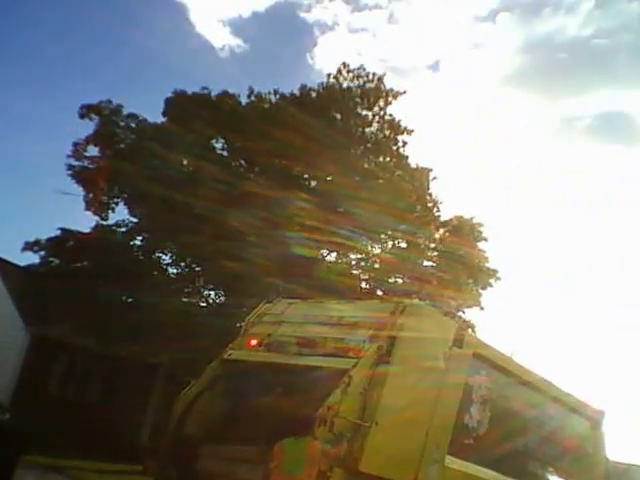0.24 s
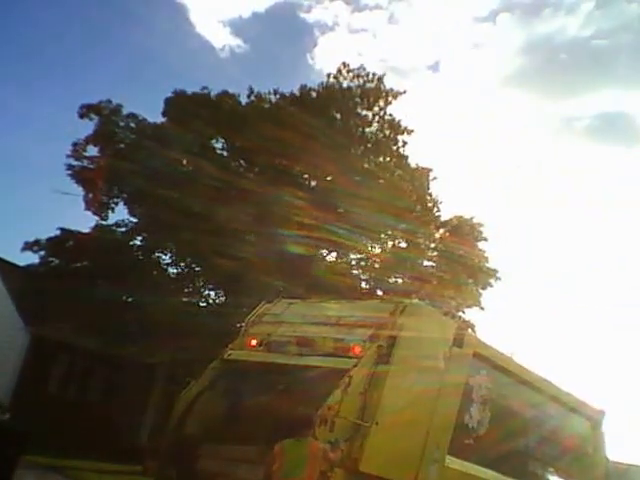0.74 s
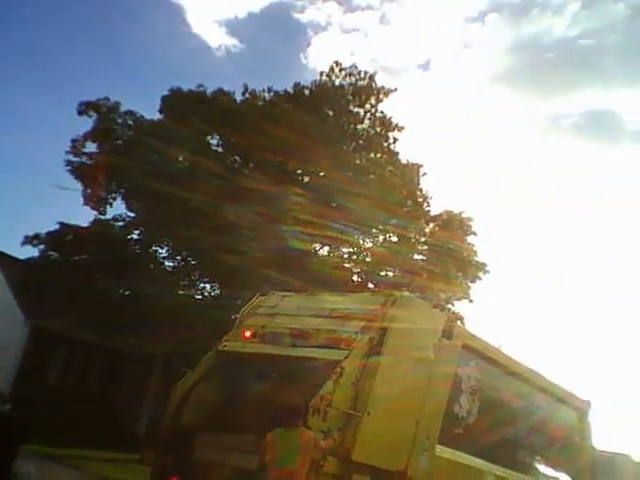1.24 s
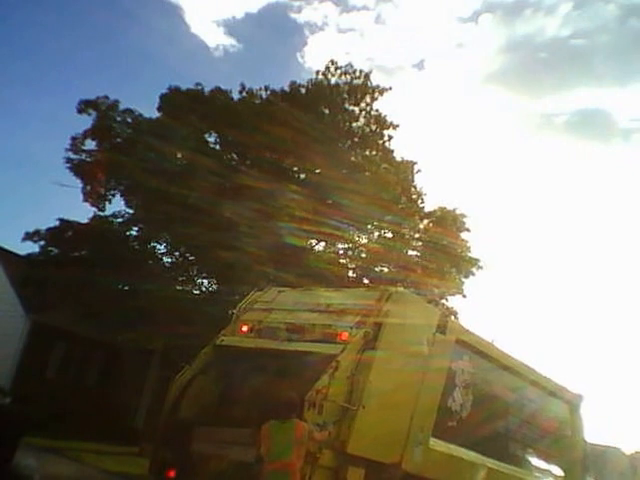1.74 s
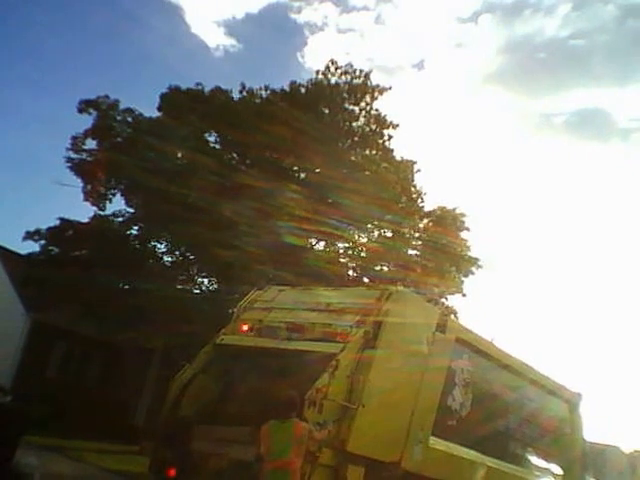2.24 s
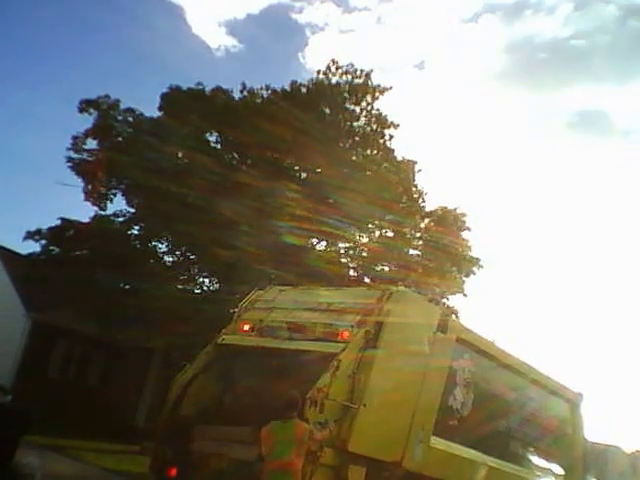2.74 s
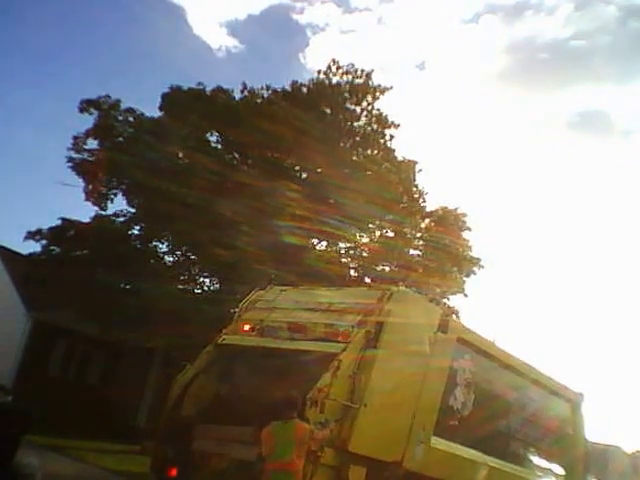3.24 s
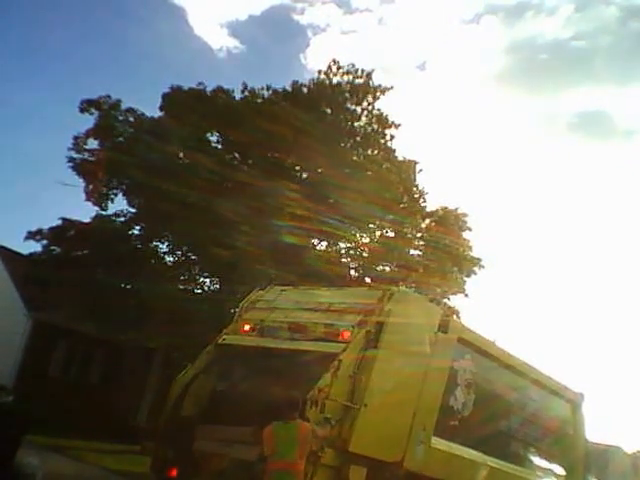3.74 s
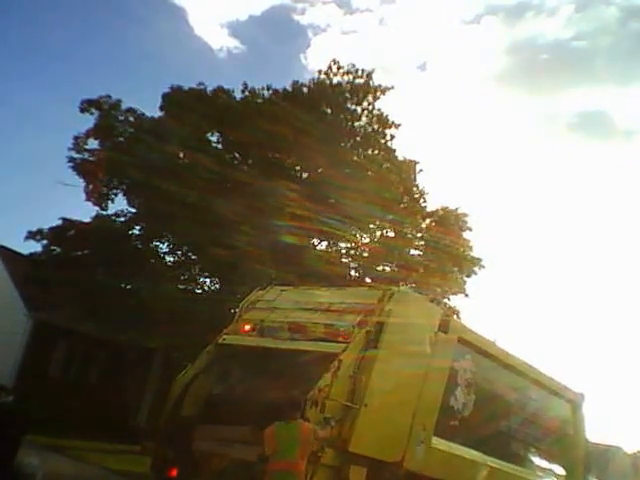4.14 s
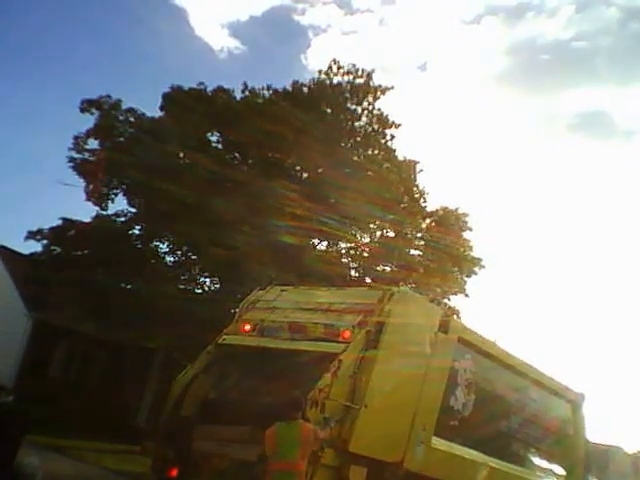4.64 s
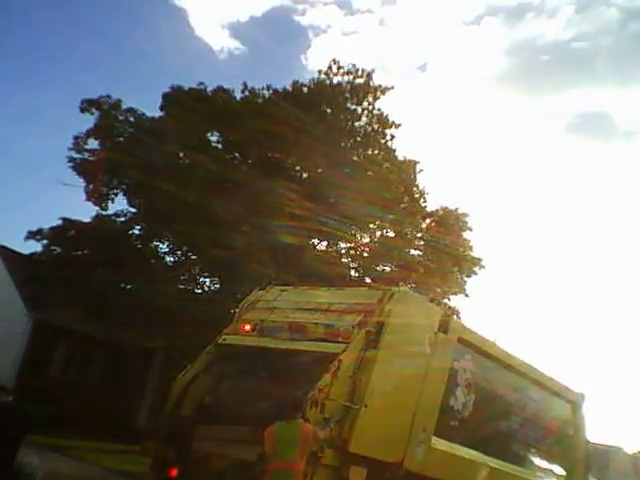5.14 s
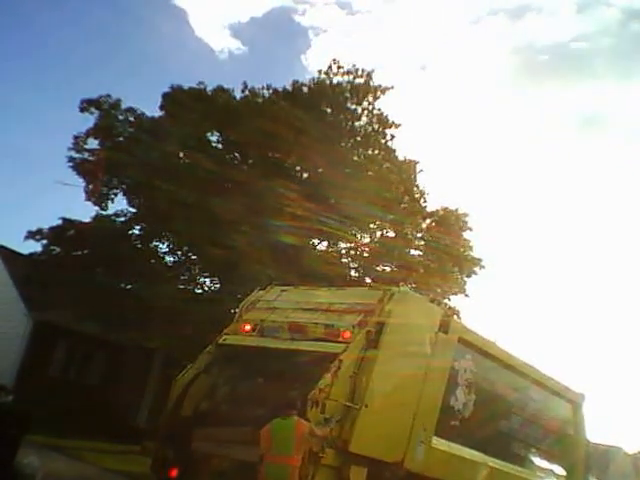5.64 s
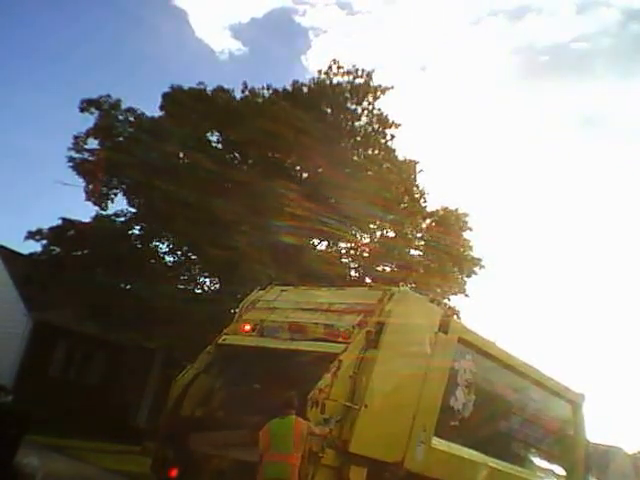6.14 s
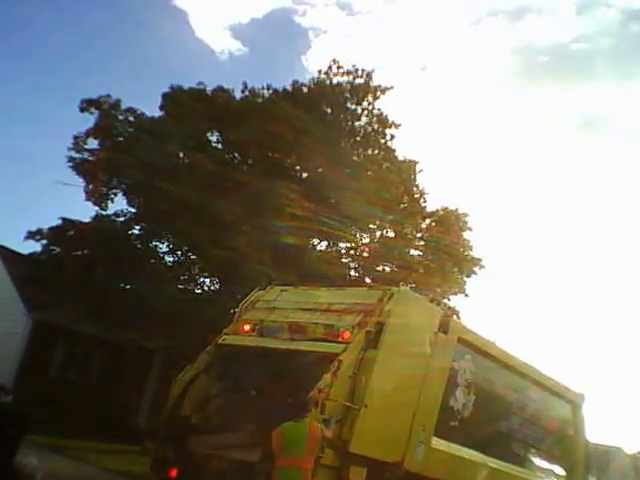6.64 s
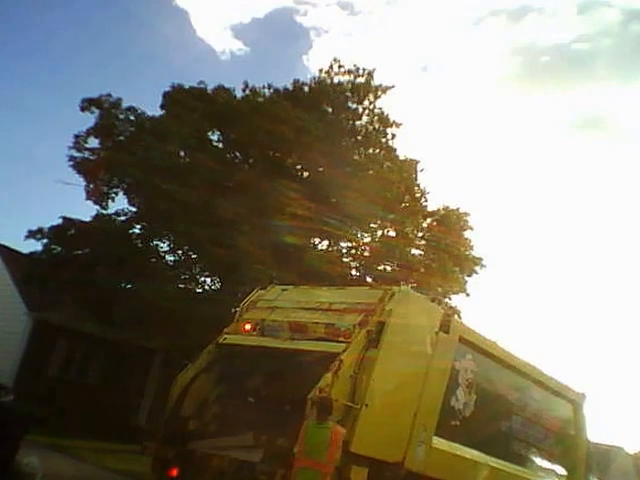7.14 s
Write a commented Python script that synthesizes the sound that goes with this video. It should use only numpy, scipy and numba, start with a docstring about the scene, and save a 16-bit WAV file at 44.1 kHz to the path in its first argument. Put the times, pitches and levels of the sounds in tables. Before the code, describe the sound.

Close by, a diesel garbage truck grinds through two packing strokes, its fluttering hydraulic howl broken midway by a burst of loud metal clanks.

```python
"""Some metres behind a small camera's microphone, a rear-loading garbage truck runs its packer at raised idle.
The diesel sounds as harmonics of its crankshaft and, with its fan, as filtered noise pulsed by the firings.
Pump ripple makes the hydraulics howl as a near sine and whine in partials; oil hisses as shaped noise;
steel bangs as noise bursts in resonators when the blade starts and changes stroke. The camera passes little
above 5 kHz, turns down after bangs, and skips a sliver of time per storage block, so steady tones flutter."""
import sys
import numpy as np
from scipy import signal
from scipy.fft import rfft, irfft
from scipy.io import wavfile
from scipy.ndimage import uniform_filter1d
from numba import njit

SR = 44100
rng = np.random.default_rng(int(sys.argv[2]) if len(sys.argv) > 2 else 0)


def file_out(sig):
    """Save sig as 16-bit WAV at sys.argv[1]."""
    # one column per channel
    cols = np.atleast_2d(sig).T
    # limit, then scale
    lim = np.clip(cols, -1, 1)
    pcm = np.round(lim * 32767).astype(np.int16)
    wavfile.write(sys.argv[1], SR, pcm)


N = 326340
T = np.arange(N) / SR

# Exhaust harmonics: (multiple of crankshaft speed [1], relative level in first stroke [dB], in second [dB])
EXHAUST_LINES = [(3, -16, -18.5), (4, 1.5, -5), (6, -6, -1.5), (7, -6.5, -10), (8, -1, 0.5),
                 (9, -8.5, -10.5)]
# Noise spectrum of fan and engine: (frequency [Hz], relative spectral density [dB per Hz])
ROAR_SPECTRUM = [(20, -11), (55, -10.5), (100, -1.5), (170, -2), (260, -0.5), (410, -4), (560, -0.5),
                 (800, -4), (1200, -2), (2000, -5), (3000, -9), (3600, -9), (4000, -17.5), (4600, -31.5)]
# Partials of each whine, scaled together to its pitch: (frequency before scaling [Hz], relative level [dB])
SWEEP_PARTIALS = [(909.8, -34), (1620, -25.5), (2552, -32), (3246, -41), (3451, -34.5), (3634, -38),
                  (4366, -46.5), (4549, -59.5)]
PACK_PARTIALS = [(890, -4.5), (1545, -6.5), (1733, 2), (2590, -8), (2821, -8), (3273, -10.5), (3461, -14.5),
                 (3677, -11.5), (4323, -20)]
SQUEEZE_PARTIALS = [(1082, -4), (1955, -0.5)]
MOAN_PARTIALS = [(603, 0)]
# Whines by name: "sweep" in the first stroke, "pack" in the second, "moan" as the second begins,
# "squeeze" as the load is pressed: (start [s], end [s], time of level peak [s], level there [dB],
# fade to either side [dB per s], pitch of strongest partial [Hz])
WHINES = { "sweep": (0, 3.5, 1.37, -17, 2, 1620), "pack": (4, 8, 5.5, -20.5, 0, 1729),
          "moan": (4, 4.5, 4.0, -21, 6, 600), "squeeze": (5.85, 8, 5.5, -22, 2, 1954), }
# Surges of oil through the valves: (peak time [s], level [dB])
OIL_SURGES = [(.8, -21), (3.5, -23), (6.1, -26)]
# Noise spectrum of the oil: (frequency [Hz], relative level [dB])
OIL_SPECTRUM = [(300, -29), (900, 1.5), (1500, 1.5), (2600, 5.5), (3500, -6.0), (4100, -5.5), (4800, -22.5)]
# Blows on the hopper: (time [s], ring level [dB], thud level [dB], brightness [dB per octave])
BLOWS = [(.058, -12.5, -28, -5.5), (.073, -13.5, -20, -6.5), (.083, -8, -22.5, -4), (.102, -9, -11.5, -5),
         (.124, -13.5, -13.5, -7), (3.443, -16.5, -32, -5), (3.495, -18, -34, -4.5),
         (3.573, -14.5, -40.5, -5.5), (3.592, -3.5, -12.5, 0), (3.632, -14, -26, -5.5),
         (3.673, -8, -13, -4), (3.711, -10, -14, -6.5), (3.749, -14, -19, -3.5), (4.325, -16.5, -47.5, 9)]
# Resonances of the steel hopper: (frequency [Hz], bandwidth [Hz], relative level [dB])
HOPPER_MODES = [(490, 56, -7.5), (675, 160, 3), (970, 220, 1.5), (1166, 200, 8), (1490, 110, -4),
                (2046, 250, 5.5), (2330, 140, -4.5), (2840, 220, -8), (3290, 110, -2)]
# Howl of each stroke: (start [s], end [s], time of level peak [s], level there [dB],
# fade to either side [dB per s], pitch [Hz])
HOWLS = [(.12, 3.59, 3.1, -13.6, 0.2, 313.9), (3.72, 7.4, 5.5, -13.4, 2, 299.8)]
# Calm spells, when the tones steady: (start [s], end [s], share of the usual gap [1])
CALMS = [(1.2, 1.55, .65), (1.55, 2.1, .22), (6.38, 7.0, .3)]

# The diesel while the blade runs free: crankshaft turns per second, and exhaust level
CRANK_HZ, EXHAUST_DB = 20.44, -29
# The blade meets the load: the engine slows a little and its exhaust grows louder
LOAD_S, LOAD_RISE_S, LOAD_SAG_HZ, LOAD_DB = 3.8, .45, .65, 5.5
# Extra exhaust level at first, as the engine takes up the pump, and its time constant
TAKE_UP_DB, TAKE_UP_S = 4.5, 1.1
# Time constants of every hydraulic tone as its valve opens and shuts
VALVE_OPEN_S, VALVE_SHUT_S = 0.1, 0.036
# As the pump takes hold, low partials settle from above and high ones climb from below
SETTLE_SHARE, CLIMB_SHARE, CLIMB_ABOVE_HZ, SETTLE_S = .04, .045, 2000, .35
SURGE_RISE_DB_PER_S, SURGE_FALL_DB_PER_S = 6.5, 4
# Harder blows rattle longer: 60 dB decay time for a 0 dB ring, and the drop in level that halves it
RATTLE_T60_S, RATTLE_HALVING_DB = .22, 20
# Sound lost between storage blocks: block length, mean gap at first outside calms, its slow shrinking
BLOCK_S, GAP_MS, GAP_SHRINK_MS_PER_S = .032, 1.06, .04
# Upper edge of the camera's band before clipping, and upper edge of the finished sound
CAMERA_HZ, TOP_HZ = 4780, 15700


def undb(db):
    """Logarithmic level: decibels to amplitude gain."""
    return 10 ** (np.asarray(db) / 20)


def unit(x):
    """Normalization: scale to an rms of one."""
    return x / np.sqrt(np.mean(x ** 2))


def walk(rate):
    """Smoothed random fluctuation: rms one, changing about rate times a second."""
    points = rng.standard_normal(4096)
    joined = np.interp(T * rate, np.arange(len(points)), points)
    return unit(uniform_filter1d(joined, max(int(SR / rate / 2), 1)))


def turns(hz, clock=1):
    """Phase is the integral of frequency [rad]; clock counts the samples that pass for each one stored."""
    return 2 * np.pi * np.cumsum(hz * clock) / SR


def colour(x, points):
    """Spectral shaping: filter by (Hz, dB) points joined on a logarithmic frequency axis, to an rms of one."""
    hz, db = np.transpose(points)
    f = np.maximum(np.fft.rfftfreq(N, 1 / SR), 1)
    gain = undb(np.interp(np.log(f), np.log(hz), db))
    return unit(irfft(rfft(x) * gain, N))


def resonate(x, hz, width_hz):
    """Simple resonance: a second-order peak with gain one at its centre."""
    return signal.lfilter(*signal.iirpeak(hz, hz / width_hz, fs=SR), x)


def ramp(start_s, length_s):
    """Linear transition: a straight rise from zero to one."""
    return np.clip((T - start_s) / length_s, 0, 1)


def stroke(start_s, end_s, peak_s, db, fade_db_per_s):
    """Exponential relaxation as a valve opens and shuts, with level falling linearly in dB off its peak."""
    opening = 1 - np.exp(-np.maximum(T - start_s, 0) / VALVE_OPEN_S)
    shutting = np.exp(-np.maximum(T - end_s, 0) / VALVE_SHUT_S)
    return opening * shutting * undb(db - fade_db_per_s * np.abs(T - peak_s))


def camera_clock(cycle_hz=8.8, cycle=0.75, scatter=.3):
    """Phase discontinuity: time jumps ahead between storage blocks, by gaps that vary in a loose cycle."""
    gap_ms = GAP_MS - GAP_SHRINK_MS_PER_S * T
    for start_s, end_s, share in CALMS:
        gap_ms = gap_ms * np.where((T >= start_s) & (T < end_s), share, 1)
    cycle_phase = turns(cycle_hz * (1 + .15 * walk(8)))
    size = np.exp(cycle * np.cos(cycle_phase) + scatter * walk(60))
    gap_ms = np.maximum(gap_ms * size / np.mean(size), 0)
    joins = np.arange(0, N, int(BLOCK_S * SR))
    clock = np.ones(N)
    clock[joins] += gap_ms[joins] * SR / 1000
    return clock


def diesel(clock, unsteady_db=1.5, roar_db=-15.5, knock=0.087, swell_db=0.67):
    """Periodic combustion: harmonics of the crankshaft, and noise modulated by three firings a turn."""
    load = ramp(LOAD_S, LOAD_RISE_S)
    crank_hz = CRANK_HZ - LOAD_SAG_HZ * load
    exhaust_db = EXHAUST_DB + LOAD_DB * load + TAKE_UP_DB * np.exp(-T / TAKE_UP_S)
    crank = turns(crank_hz * (1 + 0.0021 * walk(12)), clock)
    exhaust = 0
    for multiple, first_db, second_db in EXHAUST_LINES:
        db = first_db + load * (second_db - first_db) + unsteady_db * walk(14)
        exhaust = exhaust + undb(db) * np.sin(multiple * crank + rng.uniform(0, 2 * np.pi))
    firing = np.cos(3 * crank)
    roar = colour(rng.standard_normal(N) * (1 + knock * firing), ROAR_SPECTRUM)
    return undb(exhaust_db) * exhaust + undb(roar_db + swell_db * walk(10)) * roar


def whine(name, partials, clock, waver=0.001498, flicker_db=1.63, drift_db=1.0):
    """Additive synthesis of hydraulic partials: one shared waver in pitch, separate fluctuations in level."""
    *shape, hz = WHINES[name]
    main_hz, main_db = max(partials, key=lambda p: p[1])
    starting = np.exp(-(T / SETTLE_S) ** 2)
    speed = hz / main_hz * (1 + waver * walk(25))
    out = 0
    for partial_hz, partial_db in partials:
        offset = SETTLE_SHARE if partial_hz < CLIMB_ABOVE_HZ else -CLIMB_SHARE
        glide = 1 + starting * offset
        tone = np.sin(turns(partial_hz * speed * glide, clock))
        db = partial_db - main_db + flicker_db * walk(35) + drift_db * walk(3)
        out = out + undb(db) * tone
    return out * stroke(*shape)


def oil(flicker_db=1.5):
    """Turbulent flow: oil hisses through the valves as broadband noise in surges that build and ebb."""
    surges = []
    for s, peak_db in OIL_SURGES:
        below_db = np.maximum(SURGE_RISE_DB_PER_S * (s - T), SURGE_FALL_DB_PER_S * (T - s))
        surges.append(peak_db - below_db)
    db = np.max(surges, axis=0)  # the strongest surge rules
    hiss = colour(rng.standard_normal(N), OIL_SPECTRUM)
    return hiss * undb(db + flicker_db * walk(30))


def hopper(crash_db=-10, rise_s=0.0016, dull_hz=3400, thud_hz=118, thud_width_hz=60, thud_t60=0.085):
    """Forced resonance: decaying noise excites the modes of the plates, and a low thud in the hollow body."""
    out = np.zeros(N)
    t = T[:SR // 2]
    f = np.maximum(np.fft.rfftfreq(len(t), 1 / SR), 300)
    octaves = np.log2(np.minimum(f, 2500) / 1000)  # the brightness tilt pivots at 1 kHz
    dull = signal.butter(5, dull_hz, fs=SR, output="sos")
    attack = SR // 40  # levels are set over the first 25 ms
    for s, ring_db, thud_db, bright_db in BLOWS:
        t60 = RATTLE_T60_S * 2 ** (ring_db / RATTLE_HALVING_DB)
        # the shock needs a moment to spread through the plates
        rattle, push = rng.standard_normal((2, len(t))) * (1 - np.exp(-t / rise_s))
        rattle = signal.sosfilt(dull, rattle * undb(-60 * t / t60))
        ring = sum(undb(db) * resonate(rattle, hz, width) for hz, width, db in HOPPER_MODES)
        ring = ring + undb(crash_db) * resonate(rattle, 1100, 2500)  # broad crash
        ring = irfft(rfft(ring) * undb(bright_db * octaves), len(t))
        push = push * undb(-60 * t / thud_t60)
        thud = resonate(resonate(push, thud_hz, thud_width_hz), thud_hz, 2 * thud_width_hz)
        ring = undb(ring_db) * ring / np.std(ring[:attack])
        thud = undb(thud_db) * thud / np.std(thud[:attack])
        start = int(s * SR)
        out[start:start + len(t)] += (ring + thud)[:N - start]
    return out


def howl(clock, throb_hz=19.0, throb=0.16, rough_db=1.0, second_db=-17, third_db=-22):
    """Pressure ripple: the pump sings in the pipes as a sine with weak harmonics and a light throb."""
    throbbing = 1 + throb * np.sin(turns(throb_hz * (1 + .18 * walk(5))))
    swell = throbbing * undb(rough_db * walk(60))
    out = 0
    for *shape, hz in HOWLS:
        phase = turns(np.full(N, hz), clock)
        overtones = undb(second_db) * np.sin(2 * phase) + undb(third_db) * np.sin(3 * phase)
        out = out + stroke(*shape) * (np.sin(phase) + overtones)
    return np.sqrt(2) * swell * out


def scene():
    """Superposition: the sources of the whole truck add at one spot."""
    clock = camera_clock()
    pump = whine("sweep", SWEEP_PARTIALS, clock) + whine("pack", PACK_PARTIALS, clock)
    strain = whine("squeeze", SQUEEZE_PARTIALS, clock) + whine("moan", MOAN_PARTIALS, clock)
    return (diesel(clock) + pump + strain + oil() + hopper() + howl(clock))[None]


@njit
def follow(x, attack, release):
    """Asymmetric smoothing: an envelope with separate rates for rising and sinking."""
    out, e = np.empty(len(x)), 0.
    for i in range(len(x)):
        e += (x[i] - e) * (attack if x[i] > e else release)
        out[i] = e
    return out


def record(dry, threshold_db=-10.0, attack_s=0.026, release_s=0.54):
    """Dynamic compression and band limiting: the camera ducks loud sound, rounds peaks, low-passes and clips."""
    loudness = np.sqrt(np.abs(uniform_filter1d(dry[0] ** 2, SR // 200)))  # rms over 5 ms
    envelope = follow(loudness, 1 / (attack_s * SR), 1 / (release_s * SR))
    x = dry[0] / np.maximum(envelope / undb(threshold_db), 1)
    x = x / (1 + (x / .93) ** 8) ** (1 / 8)  # round the peaks
    x = signal.sosfilt(signal.ellip(7, .5, 47, CAMERA_HZ, fs=SR, output="sos"), x)
    clipped = np.clip(x, -.97, .97)
    return signal.sosfilt(signal.ellip(8, .2, 70, TOP_HZ, fs=SR, output="sos"), clipped)[None]


dry = scene()
out = record(dry)
file_out(out)
```